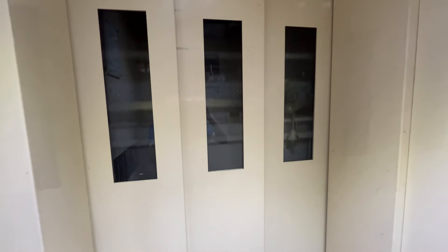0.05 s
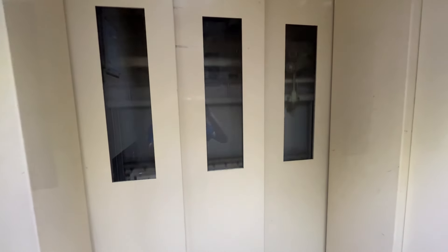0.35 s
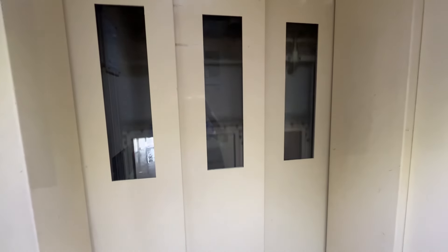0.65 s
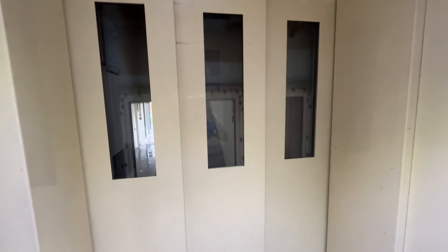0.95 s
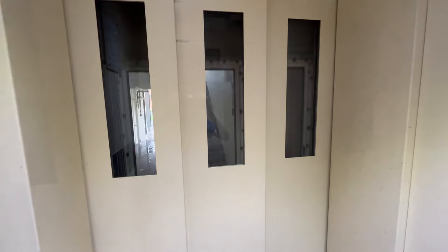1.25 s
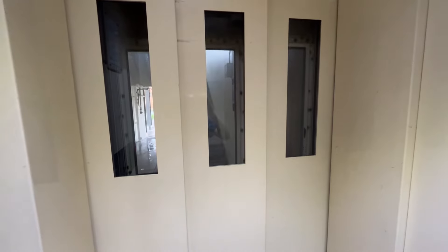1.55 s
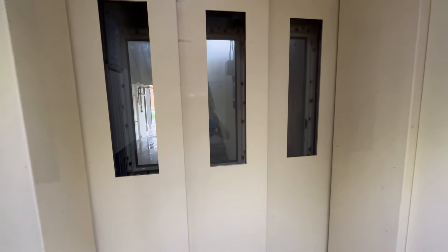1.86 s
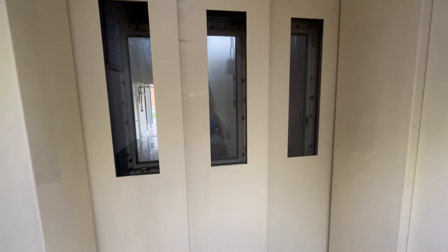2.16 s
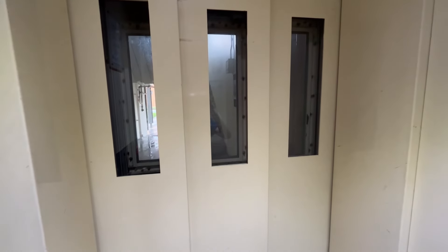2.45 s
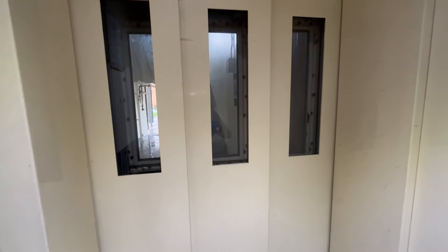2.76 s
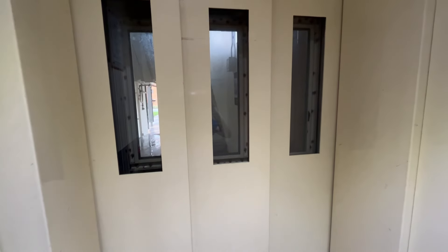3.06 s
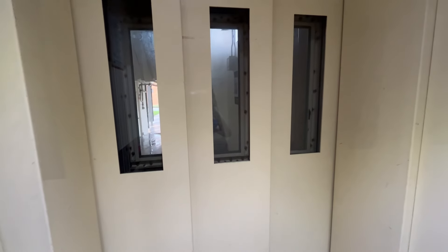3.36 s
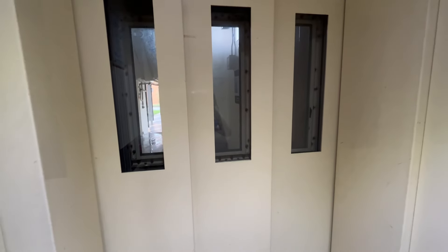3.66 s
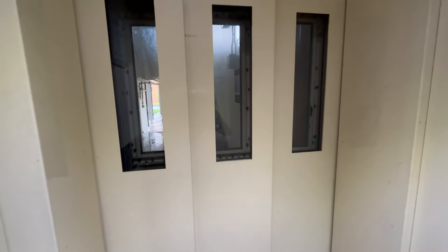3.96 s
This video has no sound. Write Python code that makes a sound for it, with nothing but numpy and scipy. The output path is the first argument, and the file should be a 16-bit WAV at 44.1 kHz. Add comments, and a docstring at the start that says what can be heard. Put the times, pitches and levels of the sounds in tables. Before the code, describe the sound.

A lift mechanism clacks sharply at about 0.7 seconds, with a low boom and briefly ringing steel panels, heard inside the car over steady rumble, rushing air and hum. Duller scrapes and knocks come from the shaft between 1.3 and 2.2 seconds. A faint high whine fades as a low drone swells, peaking near 2.5 seconds. A faint tick follows at 3.1 seconds and a soft boom at 3.7.

```python
"""Inside a lift car slowing at a landing. From the start the ride rumbles, air rushes, the guide shoes
hiss, the mains hum and the drive sings faintly. At 0.7 s a switch mechanism clacks and sets the steel
panels and the car ringing. From 1.3 s duller scrapes and knocks come from the shaft, a low drone climbs
through the car's boom and a thin high whine fades away. Near the end come a faint tick and a soft boom."""
import sys
import numpy as np
from scipy import signal
from scipy.fft import rfft, irfft, next_fast_len
from scipy.io import wavfile
from scipy.ndimage import map_coordinates

SR = 44100
rng = np.random.default_rng(int(sys.argv[2]) if len(sys.argv) > 2 else 0)


def dump(signal):
    """Clip the signal to [-1, 1] and save it as 16-bit WAV at the path in sys.argv[1]."""
    limited = np.clip(np.atleast_2d(signal).T, -1, 1)
    pcm = np.round(limited * 32767).astype(np.int16)
    wavfile.write(sys.argv[1], SR, pcm)


N = 176400  # 4 seconds
TIME = np.arange(N) / SR


def amp(db):
    return 10 ** (np.asarray(db) / 20)


def at_pitch(rows, hz):
    """Look up a frequency between (Hz, value) rows, on a log scale."""
    freqs, values = np.transpose(rows)
    return np.interp(np.log(hz + 1), np.log(freqs + 1), values)


def over_time(rows):
    """Join (seconds, value) rows with straight lines."""
    return np.interp(TIME, *np.transpose(rows))


def wobble(rate):
    """A smooth random curve through `rate` points a second."""
    return map_coordinates(rng.standard_normal(int(N * rate / SR) + 4), [TIME * rate])


def pan(db):
    """Left and right gains; positive dB leans left."""
    return amp(np.array([[.5], [-.5]]) * db)


def filtered(x, gain):
    """Scale each frequency in x by gain(hz)."""
    size = next_fast_len(N + SR // 2)
    return irfft(rfft(x, size) * gain(np.fft.rfftfreq(size, 1 / SR)), size)[..., :N]


def noise(colour, likeness, balance):
    """Stereo noise of average (rms) size 1, shaped by colour(hz) and two left-right tables."""
    def mid_and_side(hz):
        angle = np.arccos(np.clip(at_pitch(likeness, hz), -1, 1)) / 2
        return colour(hz) * np.array([np.cos(angle), np.sin(angle)])
    mid, side = filtered(rng.standard_normal((2, N)), mid_and_side)
    stereo = filtered(np.array([mid + side, mid - side]), lambda hz: pan(at_pitch(balance, hz)))
    return stereo / np.sqrt(np.mean(stereo ** 2) + 1e-20)


def peaks(rows, hz):
    """A colour made of narrow peaks, each with the power of its row."""
    return sum(amp(db) / np.sqrt(width) / (1 + ((hz - centre) / width * 2) ** 2)
               for centre, width, db in rows)


def envelope(start, rise, hold, fade):
    """Rise, stay until `hold` seconds after the start, then drop 60 dB every `fade` seconds."""
    age = TIME - start
    return np.clip(age / rise, 0, 1) * amp(-60 * np.maximum(age - hold, 0) / fade)


def tone(hz):
    """A slightly unsteady tone, left and right a quarter cycle apart."""
    phase = rng.uniform(0, 2 * np.pi) + np.array([[0], [np.pi / 2]]) * rng.choice([-1, 1])
    return np.sin(2 * np.pi * hz * TIME + phase + 0.38 * wobble(29.9))


# Each row: frequency in Hz, relative level in dB. All COLOUR tables read this way.
RUMBLE_COLOUR = [(20, -41), (32, -18), (45, 3), (72, -1), (115, -5), (135, -18.5), (400, -70.5)]
# Each row: time in seconds, level in dB. All LEVEL tables read this way.
RUMBLE_LEVEL = [(0, -29.5), (.12, -38), (.65, -41.5), (.9, -33.5), (1.25, -41.5), (2.2, -39.5),
                (3.55, -38.5), (4, -38)]
BASS_LEFT_DB = 1.5

def rumble():
    """The moving car rumbles: deep noise that swells and sinks."""
    deep = noise(lambda hz: amp(at_pitch(RUMBLE_COLOUR, hz)), [(60, 1.0)], [(60, BASS_LEFT_DB)])
    return amp(over_time(RUMBLE_LEVEL)) * deep


# The rush of air. Each row: frequency in Hz, relative level in dB.
AIR_COLOUR = [(60, -6.5), (130, -1), (215, -5), (300, -2.5), (550, -8.5), (700, -10), (1200, -19.5),
              (1500, -17.5), (2400, -26), (2800, -24.5), (3400, -35), (4600, -37), (5800, -53.5),
              (6600, -48), (8000, -54), (9600, -45.5), (12000, -58), (12600, -78)]
# Where the background sits. Each row: frequency in Hz, left minus right in dB.
BACKGROUND_PAN = [(100, 6.5), (220, 3.5), (660, 2.5), (2200, 2.5), (3900, 9.5), (5600, 13.5), (7200, 5.5),
                  (9000, -2)]
# Each row: frequency in Hz, how alike left and right are (1 is the same, 0 unrelated).
BACKGROUND_LIKENESS = [(110, 0.47), (250, 0.62), (500, 0.068), (5000, 0.059), (10000, 0.055), (13000, 0.96)]

def background_noise(colour):
    return noise(colour, BACKGROUND_LIKENESS, BACKGROUND_PAN)


def air():
    """Air rushes past the car, wavering a little."""
    return amp(-44.5 + 0.4 * wobble(8.9)) * background_noise(lambda hz: amp(at_pitch(AIR_COLOUR, hz)))


# Each row: pitch in Hz, width in Hz, relative level in dB.
GEAR_TONES = [(176.4, 15, -1.5), (254.9, 6.3, -0.5), (304.6, 7.5, -0.5), (420.8, 13, -6), (465.4, 9.8, -7),
              (704.4, 15.6, -4.5), (1970, 85, -18.5), (2726, 77, -18.5), (4570, 100, -24)]

def running_gear():
    """The running gear adds narrow, noisy tones."""
    return amp(-47.5) * background_noise(lambda hz: peaks(GEAR_TONES, hz))


# The hiss on the rails. Each row: time in seconds, level in dB.
SLIDE_LEVEL = [(.4, -71), (1.6, -68), (2.3, -71), (2.9, -68), (3.55, -69), (3.8, -78), (4, -69)]
# Each row: frequency in Hz, relative level in dB.
SLIDE_COLOUR = [(2000, -27), (3500, 2), (5000, 2.5), (5900, -1.5), (6600, -11), (8000, -10.5), (8800, -6),
                (11500, -15.5), (13000, -40)]

def guide_shoes():
    """The guide shoes hiss unevenly as they slide along the rails."""
    level_db = over_time(SLIDE_LEVEL) + 1.1 * wobble(10)
    return amp(level_db) * background_noise(lambda hz: amp(at_pitch(SLIDE_COLOUR, hz)))


# Each row: pitch in Hz, start in seconds (below 0 is already sounding), level in dB.
DRIVE_NOTES = [(1908, -3, -62.5), (1970, 2.5, -64), (2735, 0, -69.5), (4570, 0, -76)]

def drive():
    """The drive sings faintly on a few wavering notes."""
    out = np.zeros((2, N))
    for hz, start, db in DRIVE_NOTES:
        fade_in = np.clip((TIME - start) / 0.14, 0, 1)
        out += amp(db + 1.5 * wobble(6.83)) * fade_in * pan(at_pitch(BACKGROUND_PAN, hz)) * tone(hz)
    return out


# Each row: pitch in Hz, width in Hz, relative level in dB.
WHINE_TONES = [(12480, 130, -6), (13080, 350, -3)]
WHINE_HOLD_S, WHINE_FADE_DB_PER_S = 1.7, 56

def whine():
    """A thin, very high whine holds, then fades."""
    level_db = -82 - WHINE_FADE_DB_PER_S * np.maximum(TIME - WHINE_HOLD_S, 0)
    return amp(level_db) * background_noise(lambda hz: peaks(WHINE_TONES, hz))


# The drone and the hum. Each row: time in seconds, level in dB.
DRONE_LEVEL = [(1.3, -58), (1.68, -39.5), (1.76, -32), (1.9, -35), (2.05, -28), (2.28, -33), (2.34, -36),
               (2.42, -30), (2.56, -24.5), (2.76, -31), (2.83, -43), (2.92, -33), (3.03, -48), (3.3, -36),
               (3.5, -39.5), (3.7, -76)]
HUM_LEVEL = [(0, -39.5), (.65, -45), (.86, -38.5), (2.05, -43), (2.17, -50), (2.26, -43), (4, -39)]
DRONE_HZ, DRONE_AT_S, CLIMB_HZ_PER_S, HUM_HZ = 74.1, 2.55, 7, 99.07

def motor():
    """A low drone climbs steadily in pitch beside a wavering mains hum."""
    pitch = DRONE_HZ + CLIMB_HZ_PER_S * (TIME - DRONE_AT_S)
    drone = amp(over_time(DRONE_LEVEL)) * np.sin(2 * np.pi * np.cumsum(pitch) / SR)
    hum_db = over_time(HUM_LEVEL) + 0.76 * wobble(6.03)
    hum = amp(hum_db) * np.sin(2 * np.pi * HUM_HZ * TIME + 0.56 * wobble(5.11))
    return np.sqrt(2) * (drone + hum)


# Each row: frequency in Hz, relative level in dB.
TICK_COLOUR = [(1500, -10), (3500, -2.5), (8000, -19), (11500, -22), (13000, -14.5)]

def tick():
    """One faint, bright tick dies away in the car."""
    bright = background_noise(lambda hz: amp(at_pitch(TICK_COLOUR, hz)))
    return amp(-58.5) * envelope(start=3.113, rise=0.0025, hold=0, fade=0.35) * bright


# The metal in the shaft. Each row: frequency in Hz, relative level in dB.
SHAFT_COLOUR = [(250, -16), (450, -2.5), (1150, 0), (2000, -7), (4000, -27.5), (14000, -51.5)]
SHAFT_NOTES = [(463, 0), (1055, -4.5), (1143, -3)]
# For shaft and switch. Each row: frequency in Hz, how alike left and right are.
METAL_LIKENESS = [(130, .9), (300, 0.31), (1300, -0.16), (6000, -0.092), (13000, 1)]

def shaft_metal(ring_db, tilt_db):
    """Metal parts in the shaft ring at many pitches at once, with a few clear notes on top."""
    colour = lambda hz: amp(at_pitch(SHAFT_COLOUR, hz) + tilt_db * np.log2(hz + 1))
    body = noise(colour, METAL_LIKENESS, BACKGROUND_PAN)
    ring = sum(amp(db + 2.2 * wobble(60)) * tone(hz) for hz, db in SHAFT_NOTES)
    return body + amp(ring_db) * ring


# Each row: start, rise and hold in seconds, level in dB, gain of the clear notes in dB,
# treble tilt in dB per octave.
SCRAPES = [(0.62, 0.013, 0.08, -51, -20, 3.5), (1.288, 0.024, 0.048, -44.5, -8, -4.5),
           (1.477, .004, 0.079, -46.5, 2.5, 1.5), (1.878, 0.013, 0.091, -43.5, -12, -5),
           (2.14, 0.014, 0.042, -45, -6, -4)]

def scrapes():
    """Metal parts rub briefly and echo in the shaft; some ring."""
    return sum(amp(db) * envelope(start, rise, hold, fade=0.61) * shaft_metal(ring_db, tilt_db)
               for start, rise, hold, db, ring_db, tilt_db in SCRAPES)


# Each row: start in seconds, level in dB.
KNOCKS = [(1.318, -51), (1.368, -48), (1.48, -44), (1.547, -43.5), (1.902, -43), (1.931, -46.5),
          (2.186, -54)]

def knocks():
    """The rubbing parts catch and knock against each other."""
    blows = sum(amp(db) * envelope(start, rise=0.0024, hold=0, fade=0.16) for start, db in KNOCKS)
    return blows * shaft_metal(ring_db=-5.5, tilt_db=-0.5)


# Each row: start in seconds, hold in seconds, level in dB.
BOOMS = [(0.705, 0.11, -27.5), (3.659, 0.089, -32)]
BOOM_HZ = 70.1

def booms():
    """The car booms as the mechanism engages, and again more softly later."""
    return sum(amp(db) * envelope(start, rise=0.01, hold=hold, fade=0.24)
               * np.sin(2 * np.pi * BOOM_HZ * (TIME - start)) for start, hold, db in BOOMS)


# Each row: pitch in Hz, relative level in dB.
HOUSING_NOTES = [(660, -3.5), (690, -2)]
# Each row: start in seconds, level in dB.
HOUSING_BLOWS = [(0.714, -31), (.786, -35)]

def housing():
    """The switch housing gives a hollow knock as the arm lands and again as it seats."""
    return sum(amp(blow_db + note_db) * envelope(start, rise=0.003, hold=0, fade=0.2) * tone(hz)
               for start, blow_db in HOUSING_BLOWS for hz, note_db in HOUSING_NOTES)


def swell_time(hz):
    """Seconds a pitch takes to build up in the car; notes below about 490 Hz are slow."""
    return 0.001 + 0.097 / (1 + (hz / 490) ** 6)


# Each row: pitch in Hz, relative level in dB, seconds to fade by 60 dB.
PANEL_NOTES = [(330, 2, 0.91), (363, -14, 0.81), (563.5, -3.5, 1.78), (662, 0, 1.03), (751.5, -1, 0.53),
               (840.5, 0, 0.63), (926, -8.5, 1.2), (996, -11.5, 1.46), (1109, -13, 0.4), (1320, -5.5, 0.6),
               (1440, -11, 0.75), (1650, -12, 0.49), (1984, -8, .35), (2016, 0.5, 0.39), (2144, -0.5, 0.46),
               (3005, -5, 0.27), (3130, -8, 0.45)]

def panels():
    """The switch's second and hardest contact rings the steel panels."""
    start = CONTACTS[1][0]
    ring = sum(amp(db) * envelope(start, swell_time(hz), 0, fade) * tone(hz)
               for hz, db, fade in PANEL_NOTES)
    return amp(-33.5) * ring


# The blows inside the switch. Each row: start in seconds, level in dB.
CONTACTS = [(0.715, -32), (0.7217, -27.5), (0.7287, -29.5), (.747, -33.5), (0.782, -43.5)]
# Each row: frequency in Hz, relative level in dB.
CLACK_COLOUR = [(120, -22), (220, -15.5), (310, -1.5), (430, -2.5), (560, -5), (690, 1), (860, -4.5),
                (1200, -11), (1330, 0), (1600, -13.5), (2050, 0), (2300, -10), (2700, -13.5), (3000, -6),
                (3400, -17), (3800, -16), (4850, -29.5), (5600, -19), (7000, -20), (14000, -38.5)]
# Each row: frequency in Hz, left minus right in dB.
CLACK_PAN = [(200, 14.5), (660, 8), (1200, 1.5), (2200, 3.5), (4500, 14), (7200, 9), (9500, -4.5),
             (13000, 0.5)]
# How long the car rings. Each row: frequency in Hz, seconds to fade by 60 dB.
CAR_FADE = [(200, 0.97), (600, 0.69), (1200, 0.62), (2200, 0.42), (4000, 0.41), (7000, 0.3), (13000, 0.22)]
RIPPLE_SPACING_HZ, RIPPLE_DB, RIPPLE_FULL_HZ = 50.5, 3, 3300

def switch_clack():
    """Each contact cracks and rings in the car; the bass swells late and the treble dies first."""
    ripple = rng.standard_normal(SR // 20)  # close-set treble resonances, shared by all contacts
    def colour(hz):
        depth_db = RIPPLE_DB * np.minimum(hz / RIPPLE_FULL_HZ, 1)
        bumps = map_coordinates(ripple, [hz / RIPPLE_SPACING_HZ], mode="mirror")
        return amp(at_pitch(CLACK_COLOUR, hz) + depth_db * bumps)
    out = np.zeros((2, N))
    for start, db in CONTACTS:
        # Split noise into frequency bands so each can swell and fade at its own pace.
        hz, times, bands = signal.stft(noise(colour, METAL_LIKENESS, CLACK_PAN), SR, nperseg=256)
        age = np.maximum(times - start, 0)
        swell = np.minimum((age + 0.00061) / swell_time(hz[:, None]), 1)
        decay = amp(-60 * age / at_pitch(CAR_FADE, hz[:, None]))
        ring = signal.istft(bands * swell * decay, SR, nperseg=256)[1][:, :N]
        crack = amp(-6.5) * envelope(start, rise=1 / SR, hold=0, fade=0.005)
        out += amp(db) * ring * (TIME >= start) * (1 + crack)
    return out


def scene():
    """Everything as heard inside the car."""
    events = switch_clack() + housing() + panels() + scrapes() + knocks() + tick()
    bass = pan(BASS_LEFT_DB) * (booms() + motor())
    easing = amp(-0.21 * (TIME - 1))  # 0.21 dB quieter each second
    ride = rumble() + easing * (air() + running_gear())
    return events + bass + ride + guide_shoes() + drive() + whine()


def record(dry):
    """Cut everything above 13900 Hz."""
    return filtered(dry, lambda hz: hz < 13900)


dry = scene()
out = record(dry)
dump(out)
```